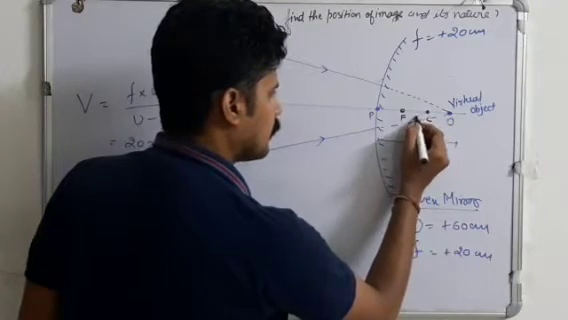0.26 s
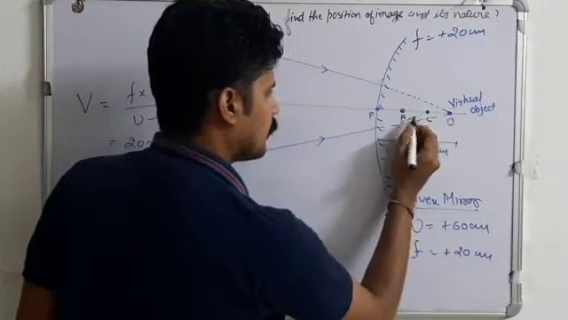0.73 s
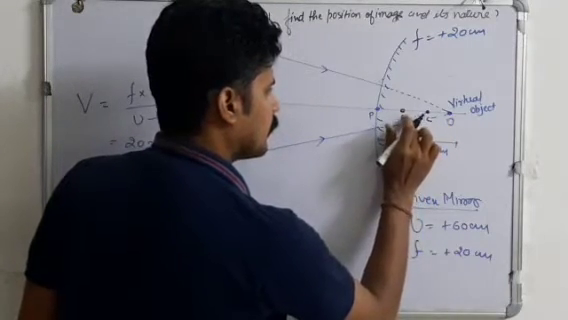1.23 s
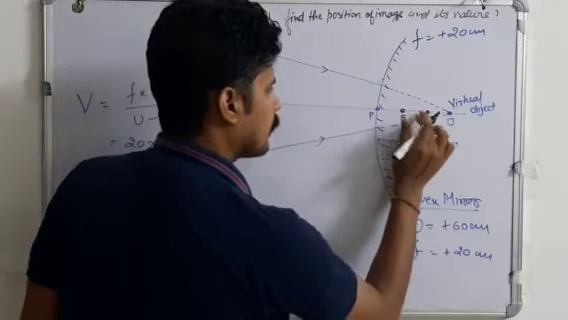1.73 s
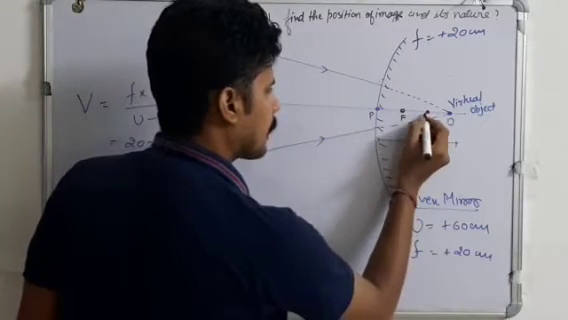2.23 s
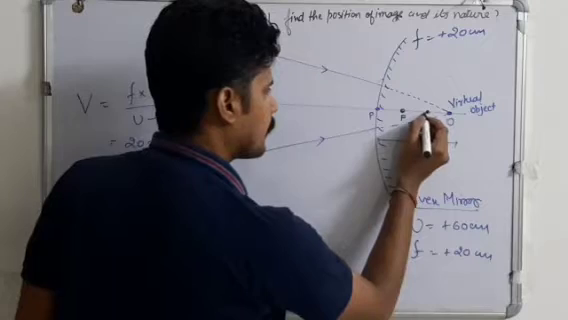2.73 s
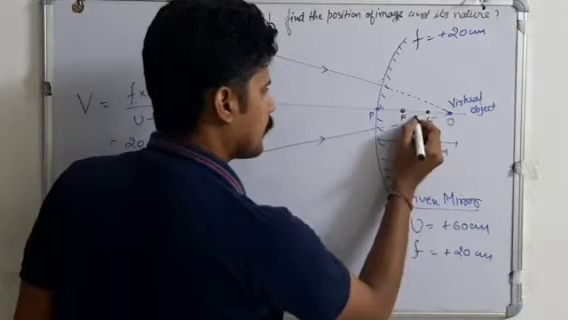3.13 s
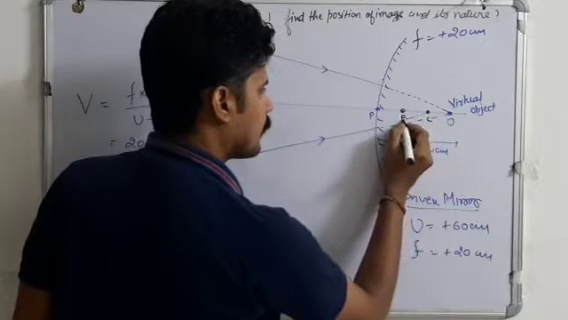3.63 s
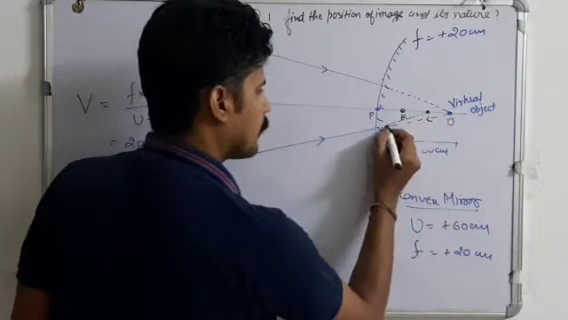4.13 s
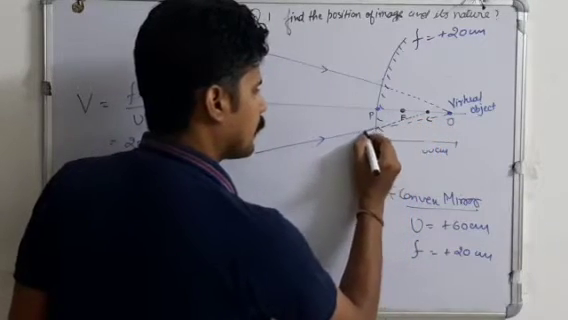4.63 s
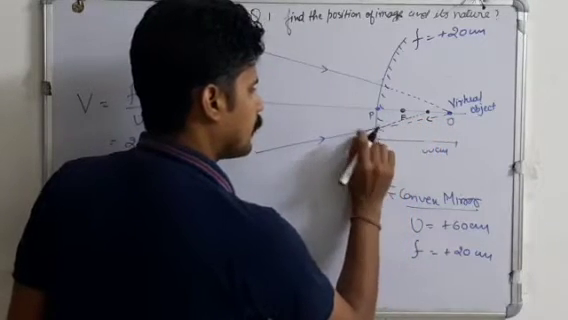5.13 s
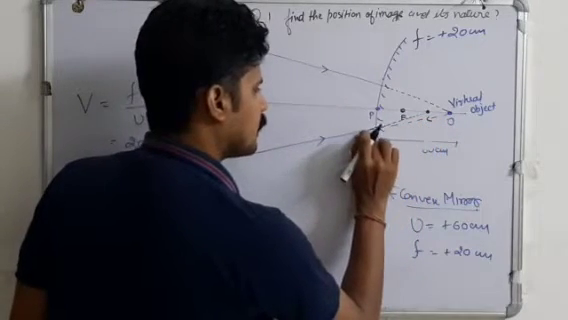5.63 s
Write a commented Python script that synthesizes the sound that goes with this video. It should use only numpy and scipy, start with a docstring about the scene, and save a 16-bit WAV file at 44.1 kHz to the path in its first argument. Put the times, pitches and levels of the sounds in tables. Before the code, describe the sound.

Steady, very quiet fan noise in stereo: a low two-pitch motor hum with faint beating side tones, a dark rush of moving air, and slow bassy swells of the room. It begins a touch softer, then settles to full level within a second. One blunt low noise bump passes at about 2.3 seconds. A sleeve brushes almost inaudibly, slightly stronger near the end, under thin microphone hiss. No speech is heard.

```python
"""A ceiling fan in a small quiet room, 5.9 s, at two microphone ports: filtered noise, tones and room modes.
From the start the motor hums near 200 and 400 Hz, blades scatter it into faint beating side tones and stir
the air, low room modes swell, a sleeve brushes and the microphone hisses; all is 2.5 dB low until 0.61 s,
full by 0.86 s. A soft low noise bump comes at 2.27 s; gusts lift the air noise, peaking at 2.4, 3.2 and 5.2 s.
The sleeve is loudest near the end."""
import sys
import numpy as np
from scipy import signal
from scipy.fft import rfft, irfft
from scipy.io import wavfile
from scipy.ndimage import uniform_filter1d

SR = 44100
rng = np.random.default_rng(int(sys.argv[2]) if len(sys.argv) > 2 else 0)


def pcm_store(signal):
    """Save signal as 16-bit PCM."""
    levels = np.round(np.clip(np.atleast_2d(signal), -1, 1) * 32767)
    wavfile.write(sys.argv[1], SR, levels.astype(np.int16).T)


N = 258505
TIME = np.arange(N) / SR  # s
HZ = np.fft.rfftfreq(N, 1 / SR)
MAGNET_HZ, BLADE_HZ, SLIP_HZ = 99.875, 12.72, 1.72
SIDE = np.array([[.5], [-.5]])  # left, right


def amp(db):
    """Decibels to gain."""
    return 10 ** (np.asarray(db) / 20)


def unit(x):
    """Scales to rms 1 over all ports."""
    return x / np.sqrt(np.mean(x ** 2) + 1e-20)


def over_time(rows):
    """Joins (t/s, value) rows by straight lines."""
    return np.interp(TIME, *np.transpose(rows))


def over_pitch(rows, hz):
    """Joins (f/Hz, value) rows on a log-frequency axis."""
    f_hz, value = np.transpose(rows)
    return np.interp(np.log(hz + 1), np.log(f_hz + 1), value)


def wander(fastest_hz, count=16):
    """Slow irregular curve of rms 1: sines of random phase."""
    rates_hz = np.geomspace(fastest_hz / 10, fastest_hz, count)
    return unit(sum(np.sin(2 * np.pi * (rate * TIME + rng.random())) for rate in rates_hz))


# likeness of the two ports: f/Hz, correlation [-1..1]
PORT_CORRELATION = [(30, 0.86), (75, 0.74), (93, 0.93), (115, 0.92), (230, 0.81), (300, 0.46), (400, 0.43),
                    (550, 0.5), (800, -0.071), (1080, -0.56), (1550, -0.18), (2200, 0.057), (3500, -0.018)]


def port_pair(hz):
    """Random complex amplitudes at two ports: alike in the bass, partly opposed near 1 kHz, unrelated above."""
    a, b, c, d = rng.standard_normal((len(hz), 4)).T
    same = np.clip(over_pitch(PORT_CORRELATION, hz), -1, 1)
    left = a + 1j * b
    own = c + 1j * d
    right = same * left + np.sqrt(1 - same ** 2) * own
    return np.array([left, right])


def room_noise(gain):
    """Diffuse noise of rms 1, shaped by a spectral gain."""
    return unit(irfft(port_pair(HZ) * gain, N))


# hiss colour: f/Hz, relative density/dB
HISS_COLOUR = [(1000, -14), (8000, -22), (10000, -13.5), (11800, -5.5), (12900, -6.5), (13300, 0),
               (15500, -0.5)]
HISS_DB = -74.5


def hiss():
    """Independent electronic noise per port, weakest at 8 kHz and strongest at the top."""
    white = rfft(rng.standard_normal((2, N)))
    return amp(HISS_DB) * unit(irfft(white * amp(over_pitch(HISS_COLOUR, HZ)), N))


# sleeve level: t/s, level/dB
SLEEVE_LEVEL = [(0, -79.5), (4.6, -79), (5.5, -77.5)]
# cloth colour: f/Hz, relative density/dB
CLOTH_COLOUR = [(1000, -8.5), (2200, -3.5), (2800, -1), (3500, -1), (4300, -5), (5200, -7), (6500, -13.5),
                (8000, -19.5), (11000, -33)]
STROKES_DB, STROKES_HZ = 1, 8  # rms depth, fastest rate


def sleeve():
    """Faint cloth friction: coloured noise, uneven as the arm moves."""
    level_db = over_time(SLEEVE_LEVEL) + STROKES_DB * wander(STROKES_HZ)
    return amp(level_db) * room_noise(amp(over_pitch(CLOTH_COLOUR, HZ)))


# bump colour: f/Hz, relative density/dB
BUMP_COLOUR = [(50, -25), (85, -11), (125, 2.5), (170, 3), (240, -1.5), (320, -10), (500, -15.5),
               (750, -20), (1500, -30.5), (4000, -64.5)]
BUMP_AT_S, BUMP_RISE_S, BUMP_HOLD_S, BUMP_T60_S = 2.265, .055, .085, .6
BUMP_DB = -43.5


def bump():
    """Muffled push of noise: linear rise, hold, exponential decay in the room."""
    age_s = TIME - BUMP_AT_S
    decay_s = np.maximum(age_s - BUMP_RISE_S - BUMP_HOLD_S, 0)
    shape = np.clip(age_s / BUMP_RISE_S, 0, 1) * amp(-60 * decay_s / BUMP_T60_S)
    return amp(BUMP_DB) * shape * room_noise(amp(over_pitch(BUMP_COLOUR, HZ)))


def room_mode(hz, width_hz, balance_db, swell):
    """A low room mode: a sine whose phase drifts (smoothed random walk) as it swells and fades."""
    walk_rad = np.cumsum(rng.standard_normal(N)) * np.sqrt(2 * np.pi * width_hz / SR)
    drift_rad = uniform_filter1d(walk_rad, size=6000)
    wave = unit(np.sin(2 * np.pi * hz * TIME + drift_rad))
    return amp(over_time(swell) + SIDE * balance_db) * wave


# swell of the lowest mode: t/s, level/dB
BOOM_LEVEL = [(0, -59.5), (.88, -67), (1.27, -57), (1.8, -69), (2.3, -69), (2.52, -56), (2.75, -64),
              (3.0, -56), (3.25, -60), (3.46, -54.5), (3.8, -57.5), (4.9, -56), (5.2, -63.5), (5.62, -55),
              (5.86, -62)]
# swell of the upper mode: t/s, level/dB
DRONE_LEVEL = [(0, -74), (.5, -54), (.95, -72), (1.35, -54.5), (1.54, -55.5), (1.65, -64), (2, -54),
               (2.17, -70.5), (2.38, -53), (2.55, -67), (2.88, -52.5), (3.25, -65), (3.6, -54),
               (4.249, -68.5), (5.1, -60.5), (5.8, -64)]


def low_modes():
    """The two strongest low room modes."""
    boom = room_mode(hz=50.6, width_hz=.72, balance_db=1.1, swell=BOOM_LEVEL)
    drone = room_mode(hz=140.6, width_hz=1.2, balance_db=-.4, swell=DRONE_LEVEL)
    return boom + drone


# gusts: peak t/s, length/s, lift/dB
GUSTS = [(2.357, 0.28, 0.6), (3.18, 0.74, 3), (5.198, 3.4, 1)]
WANDER_DB, WANDER_HZ = 1.07, 5  # rms depth, fastest rate


def draught():
    """Air strength in dB: slow wander plus smooth gusts."""
    level_db = WANDER_DB * wander(WANDER_HZ)
    for peak_s, length_s, lift_db in GUSTS:
        phase = np.clip((TIME - peak_s) / length_s, -.5, .5)
        level_db = level_db + lift_db * np.cos(np.pi * phase) ** 2
    return level_db


def resonance(hz, width_hz):
    """Gain of a steep-sided resonance, -6 dB at width_hz off centre."""
    return 1 / (1 + ((HZ - hz) / width_hz) ** 2)


# stirred-air colour: f/Hz, relative density/dB
AIR_COLOUR = [(20, -15), (32, -20.5), (45, -7.5), (85, -13), (125, -13), (250, -3.5), (350, -10),
              (550, -10), (780, -16), (950, -15), (1110, -18), (1550, -22.5), (1850, -28.5), (2200, -31),
              (2700, -40), (5000, -58)]
# resonances excited by the air: f/Hz, width/Hz, level/dB
AIR_MODES = [(64.6, 2.7, -63), (68.7, 5.3, -70), (94.6, 2, -69), (118.4, 10, -58), (167.7, 6, -65),
             (282, 1.5, -69.5), (471, 11, -75), (497.6, 4.9, -69.5), (1514, 34, -79), (1654, 40, -80.5),
             (2046, 45, -81.5)]
AIR_DB, CHOP_DB = -54.6, 1.04  # rush level before chop and draught; chop peak


def air():
    """Dull rush following the draught and pulsing at the blade rate, over steadily excited resonances."""
    chop_db = CHOP_DB * np.sin(2 * np.pi * (BLADE_HZ * TIME + rng.random()))
    rush = amp(AIR_DB + chop_db + draught()) * room_noise(amp(over_pitch(AIR_COLOUR, HZ)))
    ringing = sum(amp(db) * room_noise(resonance(hz, width_hz)) for hz, width_hz, db in AIR_MODES)
    return rush + ringing


# side tones thrown off by the blades: f/Hz, relative level/dB
SCATTER_COLOUR = [(90, -10), (180, -4), (260, -.5), (350, -3.5), (480, -3), (610, -3.5), (665, -8),
                  (760, -11), (950, -11.5), (1250, -14.5), (1650, -19)]
SCATTER_DB = -58.3  # all side tones together


def blade_tones(count=16, order=4):
    """Passing blades reflect the hum: side tones at blade-rate spacing, split in three by rotor slip."""
    hz = np.array([harmonic * MAGNET_HZ + blade * BLADE_HZ + slip * SLIP_HZ
                   for harmonic in range(1, count + 1)
                   for blade in range(-order, order + 1) if blade
                   for slip in (-1, 0, 1)])
    bins = np.round(hz * N / SR).astype(int)
    lines = np.zeros((2, len(HZ)), complex)
    lines[:, bins] = port_pair(hz) * amp(over_pitch(SCATTER_COLOUR, hz))
    return amp(SCATTER_DB) * unit(irfft(lines, N))


def tone(hz, balance_db, lead_rad, start_s):
    """Steady tone of rms 1; standing waves give each port its own level and phase."""
    phase_rad = 2 * np.pi * hz * (TIME + start_s) + SIDE * lead_rad
    return unit(-amp(SIDE * balance_db) * np.cos(phase_rad))


# main hum level: t/s, level/dB
HUM_LEVEL = [(0, -46.3), (.45, -48.2), (.75, -46), (1.05, -46.6), (1.7, -47.5), (1.92, -45.5),
             (2.15, -46.5), (2.55, -46.5), (3.0, -47), (3.6, -46.5), (4.15, -47), (4.6, -46.5), (5.3, -46),
             (5.86, -47)]
# other tones: multiple of MAGNET_HZ, blade order, slip order, level/dB, left-right/dB, left lead/rad
MOTOR_TONES = [(1, 0, 0, -69.5, -3.7, -.1), (2, -2, 0, -66, -5, .3), (2, -1, 0, -64.2, 4.7, 0),
               (2, 1, 0, -73, 9, -1), (2, 2, 0, -60.3, 1.5, 0), (2, 3, -1, -58.7, -.7, .1),
               (2, 3, 0, -63.3, -3.7, .3), (2, 4, 0, -66.2, 8, -.1), (2, 6, 1, -67.5, 4, -.7),
               (3, -4, 0, -69, 8, .4), (3, -3, 0, -68, 1, .5), (3, -3, 1, -66.5, 2, .5),
               (3, 0, 0, -60.3, -6.9, 1.4), (3, 0, -2, -73, 0, .2), (3, 0, 1, -72, 6, .9),
               (3, 2, 0, -73, 4, .1), (3, 3, 0, -76, -9, -1.3), (4, 1, 0, -73.5, -4, .3),
               (4, 2, 0, -64.6, -1, .15), (5, -4, -1, -75.5, 0, -.9), (5, -3, 1, -73, -3, .8),
               (5, 1, 0, -75, -10, 2.3), (5, 4, 0, -77, 10, -.9), (6, -3, 1, -69, 3.8, 3.1),
               (6, -1, 1, -74.5, -9, 1.7), (6, 0, 0, -70.5, 6, .3), (6, 1, 0, -71.5, 1.5, .95),
               (6, 3, 0, -79, -4, 1.3), (7, -1, 1, -80.5, -9, -1.5), (7, 0, 1, -76, 5.8, -3),
               (7, 3, 0, -80.5, 7, 1.5), (8, 0, 0, -81, 2, 3), (8, 2, 1, -80, 3, 1.6),
               (8, 3, 1, -82, -.7, .8), (9, 0, 0, -74.5, -1.1, 1), (10, -3, 0, -80, 5, 2.7),
               (10, -2, 1, -83, 10, -2.6), (10, 0, 0, -75.5, -2.5, -1.5), (10, 2, 1, -79, -2, 2.5),
               (11, 0, 0, -87, 5, -.1), (12, 2, -1, -85.4, 1.4, -2)]
OCTAVE_DB = -52.3
THROB_DB, THROB_CREST_S = 1.6, .18  # main hum, one throb per slip cycle
WAVER_DB, WAVER_HZ = .45, 12  # main hum: rms depth, fastest rate
FADE_DB_PER_KHZ = 5  # slip-rate fading, deeper for higher tones


def motor():
    """One magnetic pull drives the harmonics; blades and rotor slip shift some of them sideways."""
    start_s = rng.random()
    throb_db = THROB_DB * np.cos(2 * np.pi * SLIP_HZ * (TIME - THROB_CREST_S))
    hum_db = over_time(HUM_LEVEL) + throb_db + WAVER_DB * wander(WAVER_HZ)
    out = amp(hum_db) * tone(2 * MAGNET_HZ, balance_db=-.6, lead_rad=.14, start_s=start_s)
    out += amp(OCTAVE_DB) * tone(4 * MAGNET_HZ, balance_db=-1.1, lead_rad=.27, start_s=start_s)
    for harmonic, blade, slip, db, balance_db, lead_rad in MOTOR_TONES:
        hz = harmonic * MAGNET_HZ + blade * BLADE_HZ + slip * SLIP_HZ
        in_step = slip == 0 and blade % 2 == 0  # hum flutters at twice the blade rate
        beat = np.cos(2 * np.pi * (SLIP_HZ * TIME + rng.random()))
        fading = unit(amp(FADE_DB_PER_KHZ * hz / 1000 * beat))
        tone_start_s = start_s if in_step else rng.random()
        out += amp(db) * fading * tone(hz, balance_db, lead_rad, tone_start_s)
    return out


QUIET_DB, RISE_AT_S, RISE_S = -2.5, .61, .25


def opening():
    """Gain of the whole scene: low at first, then full, linear in dB."""
    risen = np.clip((TIME - RISE_AT_S) / RISE_S, 0, 1)
    return amp(QUIET_DB * (1 - risen))


def scene():
    """Sum of all sources under the opening gain."""
    background = hiss() + sleeve() + bump() + low_modes()
    fan = air() + blade_tones() + motor()
    return opening() * (background + fan)


EDGE_HZ = 15800


def record(dry):
    """About 4 ms of fade at each end, then the recorder's steep band limit."""
    fade = signal.windows.tukey(N, .0015)
    low_pass = signal.firwin(1023, EDGE_HZ, window=("kaiser", 9), fs=SR)
    return signal.oaconvolve(dry * fade, low_pass[None], "same")


dry = scene()
out = record(dry)
pcm_store(out)
```